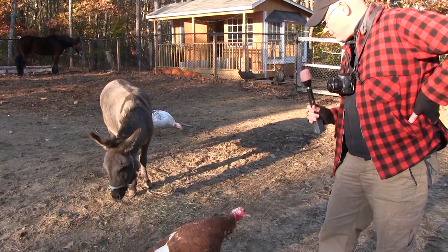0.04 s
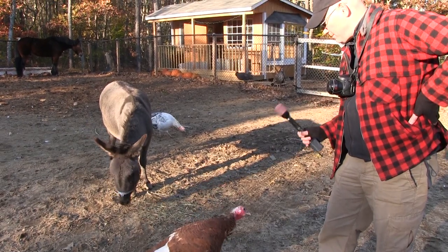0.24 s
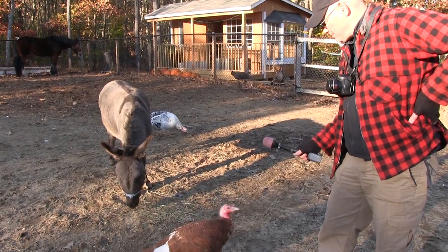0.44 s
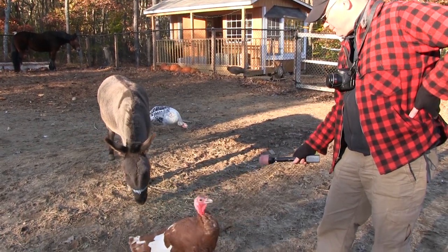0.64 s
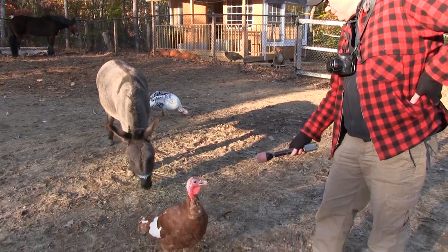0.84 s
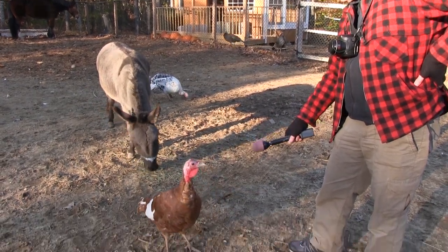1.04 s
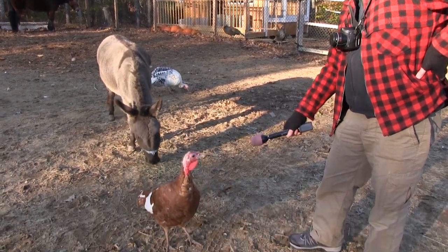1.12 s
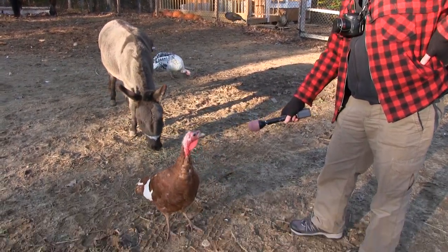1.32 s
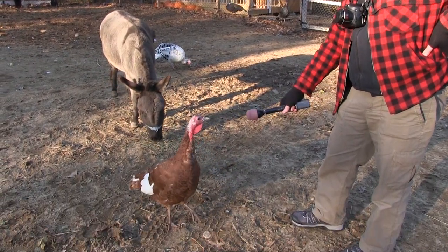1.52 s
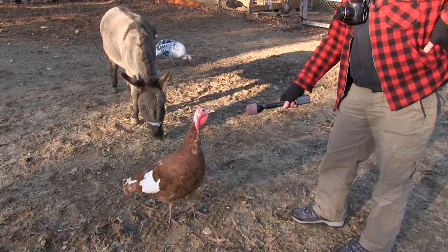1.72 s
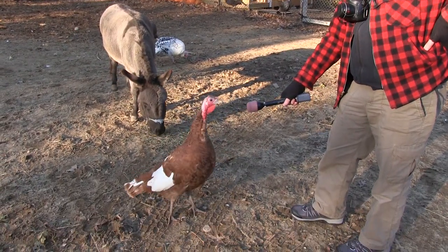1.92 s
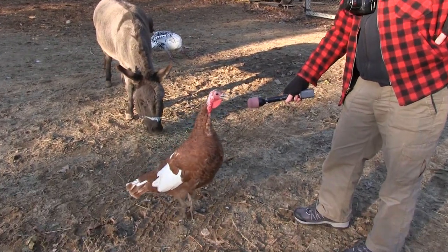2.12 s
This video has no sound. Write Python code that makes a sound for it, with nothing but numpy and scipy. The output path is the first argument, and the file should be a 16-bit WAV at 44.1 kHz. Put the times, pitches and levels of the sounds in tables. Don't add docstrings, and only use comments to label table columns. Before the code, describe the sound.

A turkey close to the microphone gives a quick yelp breaking into a falling warble, then a louder, shorter one, a pause with a faint peep, and a final warbling yelp; a distant animal wheezes and squeals early on.

```python
import sys
import numpy as np
from scipy import signal
from scipy.fft import rfft, irfft
from scipy.io import wavfile
from scipy.ndimage import uniform_filter1d

SR = 44100
rng = np.random.default_rng(int(sys.argv[2]) if len(sys.argv) > 2 else 0)


def dump_mix(stems):
    frames = np.atleast_2d(stems).T
    limited = np.clip(frames, -1, 1)
    pcm = np.round(limited * 32767).astype(np.int16)
    wavfile.write(sys.argv[1], SR, pcm)


def volts(x):
    e = np.asarray(x, float) / 20
    return 10 ** e


N = 96049
T = np.arange(N) / SR


def evened(x):
    return x / np.sqrt(np.mean(x ** 2) + 1e-20)


def coloured(points):
    f, db = np.transpose(points)
    hz = np.fft.rfftfreq(N, 1 / SR)
    gain = volts(np.interp(np.log(hz + 1), np.log(f + 1), db))
    return evened(irfft(rfft(rng.standard_normal(N)) * gain, N))


def drift(size):
    return evened(uniform_filter1d(uniform_filter1d(rng.standard_normal(N), size), size))


def follow(rows):
    cols = np.transpose(rows)
    start, end = cols[0][0], cols[0][-1]
    gate = np.clip(np.minimum(T - start, end - T) / .002 + 1, 0, 1)
    return gate, [uniform_filter1d(np.interp(T, cols[0], c), size=60) for c in cols[1:]]


def swell(s, width):
    return np.exp(-((T - s) / width) ** 4)


def phase(hz):
    return 2 * np.pi * np.cumsum(hz) / SR


def band(hz, width):
    r = np.exp(-np.pi * width / SR)
    z = rng.standard_normal((2, N))
    slow = z[0] + 1j * z[1]
    for _ in range(2):
        slow = signal.lfilter([1 - r], [1, -r], slow)
    return evened((slow * np.exp(1j * phase(hz))).real)


# pitch_hz, level_db
YARD = [(20, -15.5), (55, -5), (120, -1.5), (320, -11), (1290, -19), (3660, -29), (8000, -30.5),
        (14000, -32)]


def yard():
    u = T - .25
    bump = volts(-62.5) * np.exp(-(u / .025) ** 2) * np.sin(2 * np.pi * 42 * u)
    rumble = coloured([(30, -3.0), (80, -4.5), (300, -6.5), (600, -40)])
    rumble *= volts(-60.5) * np.exp(-T / .15)
    return volts(-64) * coloured(YARD) + bump + rumble


# pitch_hz, width_hz, level_db
WHEEZE = [(950, 139, -1.5), (1660, 130, -6.5), (2050, 730, -3), (2380, 82, -6.5), (3116, 400, -3.5),
          (4720, 170, -16), (6190, 830, -10.5)]
# start_s, level_db
WHEEZE_LEVEL = [(0, -55.5), (.13, -55), (.2, -52), (.33, -51), (.47, -56), (.54, -62.5), (.68, -55.5),
                (.76, -55)]
# start_s, level_db
WHEEZE_TOP = [(.12, -10.5), (.25, -5), (.48, 2.5), (.5, -14.5), (.635, -14.5), (.65, -0.5)]


def far_wheeze():
    gate, (db,) = follow(WHEEZE_LEVEL)
    top_db = np.interp(T, *np.transpose(WHEEZE_TOP))
    sag = 1 - 0.15 * np.clip(T - .2, 0, .4)
    hoarse = evened(sum(volts(d + top_db * (f > 4000)) * band(f * sag, w) for f, w, d in WHEEZE))
    wash = coloured([(500, -19.0), (900, -39), (2500, 19.5), (3400, -9.0),
                     (4000, -3.5), (8300, -3.5), (9500, -45)])
    hoarse += volts(-6 + top_db / 2) * wash
    flutter_db = 1 * drift(size=200)
    return gate * volts(db + flutter_db) * hoarse


def squeal(rows, steps_db, waver, dull_db=0, slide=0, flicker_db=3.5):
    gate, (hz, db) = follow(rows)
    turn = phase(hz * (1 + slide + waver * drift(size=150)))
    flicker = flicker_db * drift(size=170)
    late = (db.max() - db) * dull_db / 10
    stack = 0
    for k, step_db in enumerate(steps_db, 1):
        level_db = step_db + np.roll(flicker, k * N // 12) + late * max(k - 4, 0)
        stack = stack + volts(level_db) * np.cos(k * turn + k * k)
    return np.sqrt(2) * gate * volts(db) * stack


# start_s, pitch_hz, level_db
SQUEAL_A = [(0, 1035, -58), (.05, 1042, -57.5), (.062, 1039, -54.5), (.073, 977, -64), (.082, 1044, -54.5),
            (.105, 1003, -73), (.12, 1048, -67.5), (.16, 1028, -65.5), (.245, 1015, -60.5),
            (.33, 1025, -74)]
SQUEAL_B = [(.69, 838, -88), (.728, 811, -76), (.742, 838, -66), (.8, 844, -64), (.812, 872, -63)]
SQUEAL_C = [(.813, 925, -63), (.85, 925, -64), (.87, 930, -72), (1.13, 935, -80)]
SQUEAL_D = [(1.945, 842, -70), (1.985, 837, -66.5)]
# start_s, pitch_hz, level_db
STRAND = [(.076, 2720, -72), (.09, 2400, -65), (.112, 2130, -74)]
A_DB = [-3, 1, 9, -17.5, -24, -15.5, -22.5]
B_DB = [4, -22, -3.5, -8, 4, -28, -9, -18, -20, -14, -7]
C_DB = [1, -2, -3.5, -8.5, -21, -10.5, -21, -14, -19.5, -12.5]
D_DB = [6]


def far_squeals():
    broken = T > .172
    beat = np.pi * 37.5 * (T - .22)
    throb = volts(-21 * broken * (np.sin(beat) ** 2 - 0.4271))
    slide = -.012 * broken * np.sin(2 * beat)
    out = throb * squeal(SQUEAL_A, A_DB, .004, slide=slide, flicker_db=2.0)
    out += squeal(SQUEAL_B, B_DB, 0.00088, flicker_db=1.5)
    out += squeal(STRAND, D_DB, 0.0036)
    out += squeal(SQUEAL_C, C_DB, 0.006, dull_db=-8)
    return out + squeal(SQUEAL_D, D_DB, 0.0027)


# pitch_hz, level_db
THROAT = [(3300, 0), (4300, 1.5), (4900, -11), (5400, -20.5), (6300, -24.5), (9000, -8.5), (13000, -40)]
# middle_s, half_width_s, half_line_db, rasp_db, jitter_rad
SLIPS = [
    (0.551, 0.0026, -47, -72, 0.25),
    (0.847, 0.0035, -10, -76, .3),
    (0.86, 0.007, -20, -40.5, 0.17),
    (0.961, 0.0029, -33, -69, 0.11),
    (1.914, 0.0025, -39, -83, 0.061),
    (2.15, 0.013, -22, -72, 0.073),
    (0.726, 0.032, -27, -72, 0.042),
    (0.892, 0.0175, -40, -56.5, 0.29),
    (1.985, 0.0075, -40, -76, 0.035),
    (2.064, 0.011, -44, -72.5, .07),
]


def phrase(notes, rough_db, step_db, beak_db):
    gate, (hz, first_db, second_db) = follow(np.concatenate(notes))
    u = T - 2.066
    quiver = 0.032 * np.cos(2 * np.pi * 41.6 * u) * np.exp(-(u / 0.052) ** 2)
    jitter = sum(rad * swell(s, w) for s, w, _, _, rad in SLIPS)
    turn = phase(hz * (1 + quiver)) + drift(size=30) * jitter
    out = volts(first_db) * np.cos(turn)
    shimmer_db = 1.5 * drift(size=130)
    for k in range(2, 12):
        level_db = second_db + step_db * (k - 2) ** 0.5
        if k > 2:
            level_db = level_db + np.interp(k * hz, *np.transpose(THROAT)) + np.roll(shimmer_db, k * N // 12)
        beak = volts(beak_db + first_db / 2) * np.exp(-((k * hz - 8430) / 2200) ** 2)
        out += (volts(level_db) + beak) * np.cos(k * turn + k * np.pi / 2 + (k - 1) * .6)
    pairs = sum(volts(db) * swell(s, w) for s, w, db, _, _ in SLIPS)
    out *= 1 + 2 * pairs * np.cos(turn / 2) + volts(rough_db) * drift(size=12)
    return np.sqrt(2) * gate * out


# pitch_hz, level_db
RASP = [(500, -28.5), (2000, 10.5), (4000, -16.5), (7000, -7.5), (11000, -18.5), (14000, -52.5)]


def rasp(voice):
    bursts = sum(volts(db) * swell(s, w) for s, w, _, db, _ in SLIPS)
    return coloured(RASP) * (bursts + volts(-40.5) * abs(voice))


# start_s, level_db, pitch_hz, width_s
TICKS = [
    (.848, -56, 260, .004),
    (.9605, -50, 10000, .0001),
    (1.954, -56, 6500, .00015),
    (1.9, -67, 6500, .0002),
    (1.929, -62, 6000, .0002),
    (2.009, -63, 7500, .0002),
    (2.061, -63, 5500, .0002),
]


def beak_ticks():
    return sum(volts(db) * np.exp(-((T - s) / w) ** 2) * np.cos(2 * np.pi * hz * (T - s))
               for s, db, hz, w in TICKS)


def puffs(voice):
    sos = signal.butter(2, [22, 49], "band", fs=SR, output="sos")
    return volts(-32.5 + 17.5) * signal.sosfilt(sos, abs(voice))


def yard_echo(voice):
    t = T[:SR // 2]
    tail = rng.standard_normal(SR // 2) * volts(-60 * t / .6) * (t > .006)
    return volts(-34) * signal.fftconvolve(voice, tail / np.linalg.norm(tail))[:N]


# start_s, pitch_hz, fundamental_db, overtone_db
CUT_1 = [(.543, 764, -42.5, -49.5), (.549, 899, -32, -32), (.555, 1193, -44, -49), (.557, 1483, -32, -44),
         (.565, 1520, -42, -51.5), (.575, 1580, -71.5, -81.5)]
ARCH_1 = [(.558, 2170, -81, -71.5), (.575, 2500, -69, -67), (.59, 2523, -66.5, -68.5),
          (.603, 2263, -60.5, -50), (.615, 1680, -58.5, -53.5)]
FALL_1 = [(.615, 1492, -44.5, -59.5), (.619, 1402, -29, -35), (.628, 1383, -30, -36),
          (.643, 1118, -38.5, -50.5), (.656, 1175, -36, -51.5), (.675, 1022, -35.5, -67.5)]
WARBLE_1 = [(0.677, 841, -40.5, -40), (0.693, 837.6, -38, -25), (0.71, 773, -40, -35),
            (0.718, 712, -38.5, -29.5), (0.732, 723, -36.5, -31.5), (0.741, 783, -39.5, -37.5),
            (0.751, 717, -38.5, -29), (.768, 650, -39, -35.5), (0.792, 534, -57.5, -60.5)]
CUT_2 = [(.8465, 696, -31.5, -33.5), (.85, 963, -48, -29.5), (.853, 1048, -20, -36),
         (.858, 1177, -22.5, -18), (.863, 1344, -21, -25.5), (.8665, 1402, -24.5, -29.5),
         (.869, 1872, -25, -45), (.872, 2050, -20.5, -48), (.8745, 2380, -37, -49)]
ARCH_2 = [(0.876, 2386, -29, -50.5), (0.885, 2490, -41, -58.5), (0.891, 2762, -38, -76),
          (0.898, 2456, -47, -63), (0.9, 2372, -32.5, -51.5), (.908, 1882, -41.5, -53),
          (0.912, 1701, -22, -51), (0.924, 1659, -19.5, -45), (0.926, 1489, -31.5, -52)]
FALL_2 = [(0.929, 1315, -24.5, -30.5), (0.947, 1147, -32.5, -43.5), (.953, 950, -38, -44),
          (0.957, 783, -38, -30), (0.97, 543, -48.5, -53.5)]
PEEP = [(1.392, 787, -54.5, -98), (1.413, 1275, -64.5, -73), (1.452, 1184, -58.5, -67.5),
        (1.465, 1257, -55, -64), (1.482, 1262, -61, -69.5), (1.497, 1407, -62.5, -75)]
CUT_3 = [(1.9085, 717, -42, -57), (1.914, 760, -32, -36), (1.919, 885, -30.5, -51.5),
         (1.923, 1082, -31, -51), (1.933, 1177, -32, -44.5), (1.945, 1255, -32, -51.5),
         (1.951, 1495, -50, -66), (1.956, 1380, -67, -82.5), (1.972, 1310, -50, -75)]
FALL_3 = [(1.975, 1678, -53, -51), (1.979, 1616, -25.5, -55), (1.988, 1567, -25.5, -51),
          (1.993, 1424, -30.5, -49.5), (1.997, 1227, -29, -35.5), (2.023, 1162, -31.5, -41.5),
          (2.054, 999.5, -35.5, -47.5)]
WARBLE_3 = [(2.059, 1024, -33, -43.5), (2.098, 1009, -33.5, -42.5), (2.107, 1142, -29, -41.5),
            (2.121, 1009, -33, -40.5), (2.134, 1009, -31, -45)]
SINK_3 = [(2.138, 906, -33.5, -48), (2.144, 856, -31, -30.5), (2.151, 901, -28, -36.5),
          (2.157, 867, -32, -33), (2.159, 768, -33, -26.5), (2.165, 718, -33.5, -31),
          (2.178, 694.3, -38.5, -27)]
# notes, roughness_db, overtone_step_db, beak_ring_db
PHRASES = [
    ([CUT_1], -30.5, -15, -73),
    ([ARCH_1], -33.5, -24, -57),
    ([FALL_1, WARBLE_1], -34, -21.5, -67.5),
    ([CUT_2, ARCH_2, FALL_2], -26.5, -13.5, -59),
    ([PEEP], -15.5, -20, -80),
    ([CUT_3], -35.5, -16, -71),
    ([FALL_3, WARBLE_3, SINK_3], -28, -16.5, -75),
]


def turkey():
    voice = sum(phrase(*p) for p in PHRASES)
    voice += rasp(voice)
    throat_floor = signal.butter(2, 520, "high", fs=SR, output="sos")
    voice = signal.sosfiltfilt(throat_floor, voice) + beak_ticks()
    return voice + puffs(voice) + yard_echo(voice)


def scene():
    return (yard() + far_wheeze() + far_squeals() + turkey())[None]


def top_cut(x):
    return signal.sosfilt(signal.butter(12, 13860, fs=SR, output="sos"), x)


def record(dry):
    edge = signal.firwin(511, 14500, window=("kaiser", 9), fs=SR)
    mix = signal.oaconvolve(dry, edge[None], "same")
    return top_cut(mix)


dry = scene()
out = record(dry)
dump_mix(out)
```